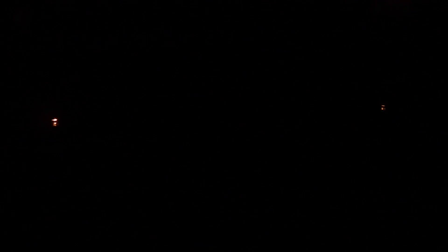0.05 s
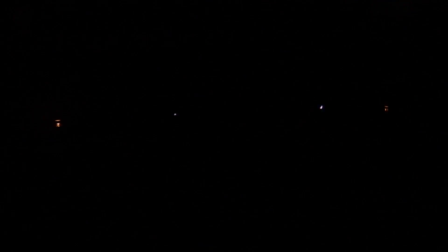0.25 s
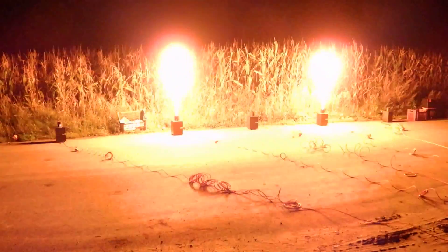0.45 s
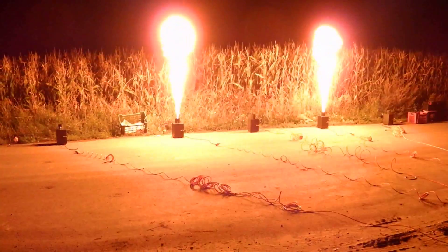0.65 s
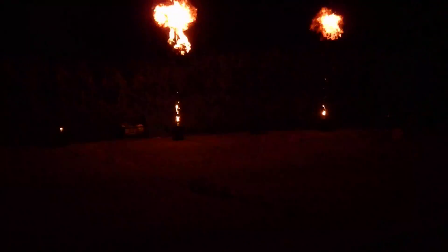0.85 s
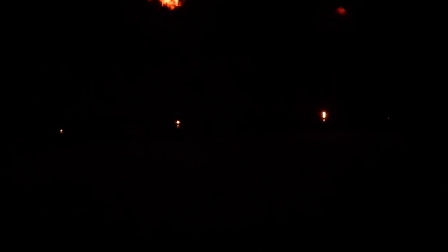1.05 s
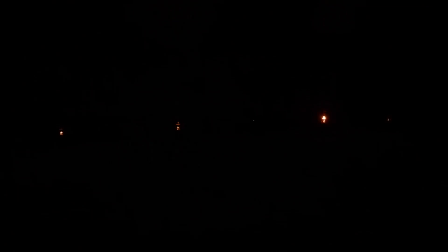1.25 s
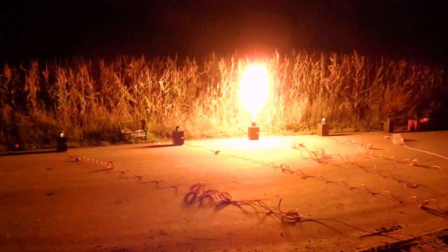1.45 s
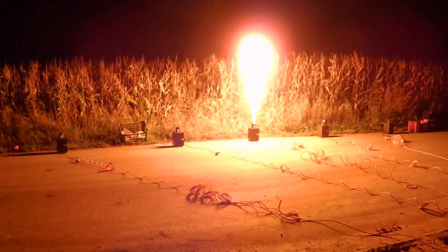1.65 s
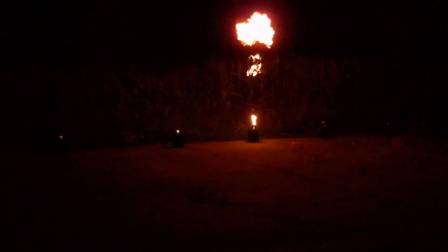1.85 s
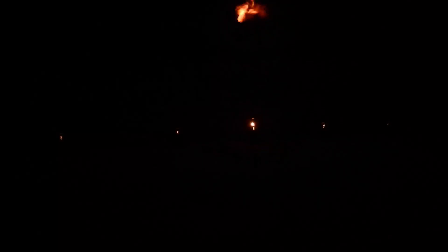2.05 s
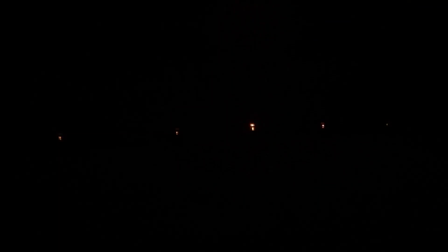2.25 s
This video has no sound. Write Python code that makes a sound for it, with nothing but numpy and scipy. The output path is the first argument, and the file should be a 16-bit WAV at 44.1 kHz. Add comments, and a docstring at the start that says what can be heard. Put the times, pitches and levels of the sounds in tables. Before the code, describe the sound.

Flame machines fire two roaring whooshes a few metres away outdoors. At 0.2 seconds a valve clacks and fuel hisses, igniting in a low whoomp that roars until about 0.7 seconds. The second burst clacks at 1.2 seconds, catches at 1.4 and roars until 1.7. Faint, rapid igniter ticks sound before, between and after, with a slight echo. A softer valve clack comes at 2.3 seconds.

```python
"""Flame projectors at night

On a paved yard a few metres away, a pair of projectors fires together, then a single one. A solenoid
valve clacks, fuel hisses through the nozzle, ignites in a lumpy low whoomp and roars as a turbulent
column until the valve shuts. Between bursts, spark igniters tick about 15 times a second.
A field edge scatters a faint echo into the quiet night air."""
import sys
import numpy as np
from scipy import signal
from scipy.fft import rfft, irfft, next_fast_len
from scipy.io import wavfile
from scipy.ndimage import uniform_filter1d, map_coordinates

SR = 44100
rng = np.random.default_rng(int(sys.argv[2]) if len(sys.argv) > 2 else 0)


def to_wav(sig):
    """Store sig (one row per channel, or 1-D mono) as 16-bit WAV at the path in sys.argv[1].

    Samples outside -1..1 are clipped; the rate is SR.
    """
    pcm = np.clip(np.atleast_2d(sig), -1, 1) * 32767
    pcm = np.round(pcm).astype(np.int16)
    wavfile.write(sys.argv[1], SR, pcm.T)  # frames by channels


N = 101429
T = np.arange(N) / SR


def amp(db):
    """Amplitude ratio of a level in decibels."""
    return 10 ** (np.asarray(db) / 20)


def unit(x):
    """Normalisation to rms 1."""
    return x / np.sqrt(np.mean(x ** 2) + 1e-20)


def along(points, hz):
    """Interpolation of (frequency, value) points on a logarithmic axis."""
    f, v = np.transpose(points)
    return np.interp(np.log(hz + 1), np.log(f + 1), v)


def wobble(rate):
    """Smooth random modulation with rate knots a second."""
    return map_coordinates(rng.standard_normal(2000), [T * rate], mode="mirror")


def filtered(x, response):
    """Linear filtering: the spectrum of x times a frequency response."""
    size = next_fast_len(N + SR // 2)
    return irfft(rfft(x, size) * response(np.fft.rfftfreq(size, 1 / SR)), size)[..., :N]


def swell(start, stop, rise, slope, fall):
    """Envelope that rises until start, slopes until stop, then falls; rates in dB/s."""
    held = np.clip(T, start, stop) - (start + stop) / 2
    return amp(slope * held - rise * np.maximum(start - T, 0) - fall * np.maximum(T - stop, 0))


def fade(start, t60):
    """Exponential decay from a sudden onset, by 60 dB in t60 seconds."""
    return (T >= start) * amp(-60 * np.maximum(T - start, 0) / t60)


def gaussian(offset, width):
    """Bell curve of height 1 and standard deviation width."""
    return np.exp(-(offset / width) ** 2 / 2)


def ring(start, modes, pitch=1, length=1):
    """Free vibration of damped modes, whose strengths vary from blow to blow."""
    t = np.arange(SR // 3) / SR
    scatter_db = rng.normal(0, 1.5, len(modes))
    tone = sum(amp(db + extra - 60 * t / (t60 * length)) * np.sin(2 * np.pi * hz * pitch * t)
               for (hz, db, t60), extra in zip(modes, scatter_db))
    return np.pad(tone, (round(start * SR), N))[:N]


# Likeness of the two channels: (frequency [Hz], correlation [-1 to 1])
SOURCE_CORRELATION = [(100, .998), (600, .992), (1300, .955), (2600, .91), (5500, .76), (9000, .7),
                      (14000, -.35)]
def noise(spectrum, correlation=SOURCE_CORRELATION):
    """Partly coherent stereo noise of a given spectrum, held steady at rms 1."""
    def mid_side_gains(hz):
        angle = np.arccos(np.clip(along(correlation, hz), -1, 1)) / 2
        return amp(along(spectrum, hz)) * [np.cos(angle), np.sin(angle)]
    mid, side = filtered(rng.standard_normal((2, N)), mid_side_gains)
    pair = np.array([mid + side, mid - side])
    local_power = uniform_filter1d(np.mean(pair ** 2, axis=0), size=1100)
    return unit(pair / np.sqrt(np.abs(local_power) + 1e-20))


# Ignitions: (full at [s], spent at [s], rise [dB/s], burn level [dB], push level [dB])
FIREBALLS = [(0.319, 0.396, 432, -22, -34.5), (1.394, 1.424, 521, -26.5, -26.5)]
# Spectra of the burning cloud and the displaced air: (frequency [Hz], level [dB])
BURN_SPECTRUM = [(20, -31), (45, -5), (75, -0.5), (135, 2.5), (205, 4.5), (310, -19.5), (520, -15),
                 (800, -15.5), (1200, -41), (3000, -67), (9000, -52)]
PUSH_SPECTRUM = [(15, 0), (35, 2), (52, 3.5), (80, 2.5), (120, -4), (220, -31), (600, -57)]
def fireball(lumps_db=-1.5, lump_rate_hz=90):
    """Deflagration: the fuel cloud burns ever harder in lumps, pushes air aside and is suddenly spent."""
    burn, push = np.zeros((2, N))
    for full, spent, rise, burn_db, push_db in FIREBALLS:
        burn += amp(burn_db) * swell(full, spent, rise, slope=67, fall=955)
        push += amp(push_db) * swell(full, spent, rise=560.5, slope=101, fall=812)
    lumps = amp(lumps_db * wobble(lump_rate_hz))
    return burn * lumps * noise(BURN_SPECTRUM) + push * noise(PUSH_SPECTRUM)


# Firings: (valve opens [s], fuel catches [s], column stands [s], valve shuts [s],
# jet level [dB], roar level [dB], rumble level [dB], roar decay [dB/s])
BURSTS = [(0.204, 0.3, 0.33, 0.62, -43, -35.5, -36.5, 231.5),
          (1.237, 1.342, 1.361, 1.6673, -47, -38, -35.5, 405)]
# Spectra of the standing flame: (frequency [Hz], level [dB])
ROAR_SPECTRUM = [(100, -6), (300, 5.5), (480, 13.5), (750, 4), (1100, 3), (1700, 0.5), (2400, -1.5),
                 (3300, -11), (4600, -10), (6500, -15), (8500, -24), (11000, -56.5), (16000, -29)]
RUMBLE_SPECTRUM = [(20, -22), (50, -10), (110, -1), (190, 2), (320, -9), (480, -8), (750, -20.5),
                   (1500, -53.5), (5000, -45.5)]
def column(crackle_db=1.3, crackle_rate_hz=450, linger_s=0.0024):
    """Turbulent combustion: a crackling roar that dies with the fuel, and a rumble that lingers."""
    roar, rumble = np.zeros((2, N))
    for _, catches, stands, shuts, _, roar_db, rumble_db, decay in BURSTS:
        roar += amp(roar_db) * swell(stands, shuts, rise=223, slope=7, fall=decay)
        rumble += amp(rumble_db) * swell(catches, shuts + linger_s, rise=340.5, slope=-14.5, fall=215)
    crackle = amp(crackle_db * wobble(crackle_rate_hz))
    return roar * crackle * noise(ROAR_SPECTRUM) + rumble * noise(RUMBLE_SPECTRUM)


# Surges of the flame: (time [s], half length [s], level [dB], tilt [dB/octave])
FLARES = [(0.368, 0.011, -40, 0), (0.616, 0.038, -42, -1), (1.411, 0.015, -38, 1),
          (1.664, 0.022, -40.5, -1.5)]
# Their spectrum before tilting: (frequency [Hz], level [dB])
FLARE_SPECTRUM = [(200, -2), (700, -0.5), (1800, 5), (2500, -0.5), (3400, -11.5), (5000, -6.5), (7000, -8),
                  (10500, -36.5), (15500, -6.5)]
def flares():
    """Unsteady combustion: bright surges as the fireball peaks and just before the fuel stops."""
    out = np.zeros((2, N))
    for time, half, db, tilt in FLARES:
        spectrum = [(hz, level + tilt * np.log2(hz)) for hz, level in FLARE_SPECTRUM]
        out += amp(db) * gaussian(T - time, half) * noise(spectrum)
    return out


# Puffs overhead: (time [s], half length [s], level [dB], centre frequency [Hz])
BILLOWS = [(0.698, .015, -47.5, 180), (.765, .025, -53, 70.3), (1.708, 0.03, -46.5, 165),
           (1.8, .014, -58, 150)]
def billows(log_width=.45):
    """Burnout: the detached ball of fire gives soft puffs of low, band-limited noise."""
    out = np.zeros((2, N))
    for time, half, db, hz in BILLOWS:
        band = filtered(noise(RUMBLE_SPECTRUM), lambda f: gaussian(np.log((f + 1) / hz), log_width))
        out += amp(db) * gaussian(T - time, half) * unit(band)
    return out


# Nozzle hiss: (frequency [Hz], level [dB])
JET_SPECTRUM = [(30, -26), (90, -9), (200, 7.5), (470, 17.5), (700, 11.5), (1000, 3.5), (1500, -12),
                (2250, 1.5), (3300, -14.5), (4800, -0.5), (5400, -6), (6400, 3), (7300, -3.5), (8000, -8),
                (9000, -9), (11500, -14.5), (15400, -12.5)]
# Nozzle whistles: (start [s], stop [s], frequency [Hz], level [dB])
WHISTLES = [(0.22, 0.487, 8070, -56.5), (1.236, 1.486, 7920, -60.5), (1.522, 1.664, 6430, -56)]
def jet(relative_half_width=.028):
    """Jet noise: escaping fuel hisses and whistles in narrow bands while the pressure sags slowly."""
    flow = sum(amp(db) * (T > opens) * swell(opens, shuts, rise=0, slope=-2, fall=167)
               for opens, _, _, shuts, db, *_ in BURSTS)
    out = flow * noise(JET_SPECTRUM)
    for start, stop, hz, db in WHISTLES:
        tone = filtered(noise(JET_SPECTRUM), lambda f: 1 / (1 + ((f / hz - 1) / relative_half_width) ** 2))
        out += amp(db) * unit(tone) * swell(start, stop, rise=902, slope=-8, fall=350)
    return out


# Top of the hiss: (frequency [Hz], level [dB])
SIZZLE_SPECTRUM = [(6000, -48.5), (11500, -20.5), (13500, -8), (15000, 2.5), (15800, -3)]
def sizzle(burst_levels_db=(-56, -57.5)):
    """High-frequency jet noise: strongest as the valve opens, thinning as the pressure falls."""
    flow = sum(amp(db) * (T > opens) * swell(opens, shuts, rise=0, slope=-25.5, fall=202)
               for (opens, _, _, shuts, *_), db in zip(BURSTS, burst_levels_db))
    return flow * noise(SIZZLE_SPECTRUM)


# Solenoid blows: (time [s], level [dB], pitch [ratio], decay time [ratio])
CLACKS = [(0.209, -31, 1.05, 1.05), (.2125, -31.5, 1.03, 0.94), (1.2297, -33.5, 0.99, .9),
          (1.243, -45, .97, .8), (2.2985, -41, 0.77, 0.82)]
# Soft knocks before them: (time [s], thud level [dB], tick level [dB])
KNOCKS = [(0.164, -54.5, -78), (0.185, -53, -57.5), (0.201, -52, -52), (1.178, -52, -75.5),
          (1.202, -52, -62.5), (2.229, -54.5, -81.5), (2.273, -48.5, -59.5)]
# Valve resonances: (frequency [Hz], level [dB], t60 [s])
VALVE_MODES = [(2367, -2.5, 0.067), (2650, -8, 0.06), (6000, -8.5, 0.12), (6750, 0.5, 0.061),
               (6960, -13.5, .06), (7880, -55, .06), (9650, -12, 0.068), (15000, -33, .035)]
# Spectra of hard and soft contact: (frequency [Hz], level [dB])
CRACK_SPECTRUM = [(40, -38.5), (200, -22), (1000, -2.5), (1700, -16.5), (2500, 4.5), (3700, -23),
                  (5300, -17), (6000, 1.5), (6900, 2.5), (9500, -6.5), (12000, -10), (15300, -0.5)]
THUD_SPECTRUM = [(40, -27.5), (100, -8.5), (220, 8.5), (550, 5.5), (1200, -1), (2000, -20.5), (5000, -31),
                 (16000, -51.5)]
def valves(crack_db=2, rattle_db=-11, ring_db=-3, thud_rise_s=.004):
    """Impact excitation: soft knocks, then the solenoid's metal clack with its ring and brief rattle."""
    crack, thud = noise(CRACK_SPECTRUM), noise(THUD_SPECTRUM)
    out = np.zeros((2, N))
    for time, db, pitch, length in CLACKS:
        blow = amp(crack_db) * fade(time, t60=0.027 * length)
        rattle = amp(rattle_db) * fade(time, t60=0.16 * length)
        metal = amp(ring_db) * ring(time, VALVE_MODES, pitch, length)
        out += amp(db) * (metal + (blow + rattle) * crack)
    for time, thud_db, tick_db in KNOCKS:
        onset = np.clip((T - time) / thud_rise_s, 0, 1)
        out += amp(thud_db) * thud * onset * fade(time, t60=.13)
        out += amp(tick_db) * crack * fade(time, t60=0.054)
    return out


# Discharges: (time [s], snap level [dB], ring level [dB])
SPARKS = [(0, -75, -65), (.059, -54, -58.5), (.126, -55.5, -60), (0.791, -57.5, -66), (0.86, -59.5, -72),
          (.927, -62.5, -68), (0.994, -53.5, -65), (1.059, -56, -58.5), (1.126, -59.5, -63.5),
          (1.192, -53.5, -63.5), (1.794, -59, -63.5), (1.858, -50, -60.5), (1.927, -54.5, -61.5),
          (1.993, -55, -60), (2.061, -56, -58.5), (2.127, -56, -61), (2.194, -56, -59.5),
          (2.262, -55.5, -82)]
# Snap of a spark: (frequency [Hz], level [dB])
SNAP_SPECTRUM = [(150, -13), (500, 0), (900, 10), (1400, -6.5), (1900, 5), (2500, 0), (3300, -20),
                 (5000, -15), (7000, -10.5), (10000, -25.5), (16000, -21)]
# Resonances of the burner head and cup: (frequency [Hz], level [dB], t60 [s])
HEAD_MODES = [(770, -15.5, .12), (933, -0.5, 0.17), (1324, -9, .07), (1720, -4.5, 0.02),
              (2430, -15.5, 0.05)]
CUP_MODES = [(482, -3.5, .07), (772, -3, .13), (870, -3.5, 0.037), (1900, -8.5, .04), (2200, -2, 0.032)]
def igniters(snap_gain_db=-2, pop_s=1.860, pop_db=-49):
    """Spark discharge: each snap rings the burner head; one pops the last fuel in the cup."""
    snap = amp(snap_gain_db) * noise(SNAP_SPECTRUM)
    ticks = sum(amp(snap_db) * snap * fade(time, t60=0.024) + amp(ring_db) * ring(time, HEAD_MODES)
                for time, snap_db, ring_db in SPARKS)
    return ticks + amp(pop_db) * ring(pop_s, CUP_MODES)


# Decay of the echo: (frequency [Hz], t60 [s])
ECHO_DECAY = [(150, 0.85), (600, 0.96), (2000, 0.8), (7000, 0.86), (15000, 0.21)]
def echo(x, level_db=-22.5, delay_samples=SR // 70):
    """Diffuse scattering from the field edge: a delayed tail, each frequency dying at its own rate."""
    hz, t, bands = signal.stft(rng.standard_normal((2, SR)), SR, nperseg=256)
    decay = amp(-60 * t / along(ECHO_DECAY, hz)[:, None])
    common, spread = signal.istft(bands * decay, SR, nperseg=256)[1]
    tail = np.array([common + 0.76 * spread, common - 0.13 * spread])
    tail /= np.linalg.norm(tail[0])
    delayed = np.pad(x, ((0, 0), (delay_samples, 0)))
    return amp(level_db) * signal.fftconvolve(delayed, tail, axes=1)[:, :N]


# Night background: (frequency [Hz], level [dB])
NIGHT_SPECTRUM = [(15, -38), (25, -6), (96, -11), (241, -1), (977, -14), (1120, -25), (1870, -22.5),
                  (2250, -26.5), (2720, -25.5), (3200, -31), (8000, -29.5), (10800, -36.5), (15700, -21.5)]
# Its likeness in the two channels: (frequency [Hz], correlation [-1 to 1])
NIGHT_CORRELATION = [(100, 0.68), (1000, 0.31), (4000, 0.13), (12000, .1)]
def night_air(level_db=-65.5):
    """Ambient noise: a steady hush whose coherence falls with frequency."""
    return amp(level_db) * noise(NIGHT_SPECTRUM, NIGHT_CORRELATION)


# Stereo balance of the flames: (frequency [Hz], left over right [dB])
FLAME_BALANCE = [(60, -4), (110, -2.5), (200, -2.5), (380, -2.5), (700, -1.5), (1290, -2), (2380, -7),
                 (4400, -4.5), (8120, -6), (15000, -1)]
def scene(igniter_left_db=7):
    """Superposition: flames a little to the right, igniters to the left, their echo and the night air."""
    sides = np.array([[.5], [-.5]])  # each channel takes half the level difference
    flames = valves() + jet() + sizzle() + fireball() + column() + flares() + billows()
    direct = filtered(flames, lambda hz: amp(sides * along(FLAME_BALANCE, hz)))
    direct += igniters() * amp(sides * igniter_left_db)
    return direct + echo(direct) + night_air()


def record(dry, cutoff_hz=15850):
    """Band limiting: an ideal low-pass filter removes everything above the cutoff."""
    return filtered(dry, lambda hz: hz < cutoff_hz)


dry = scene()
out = record(dry)
to_wav(out)
```